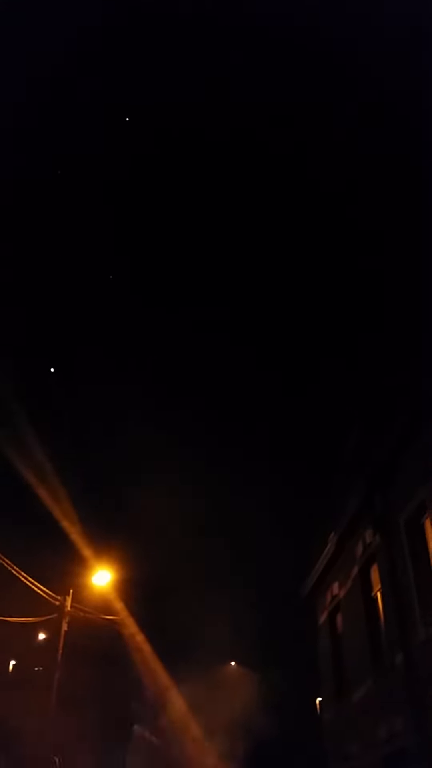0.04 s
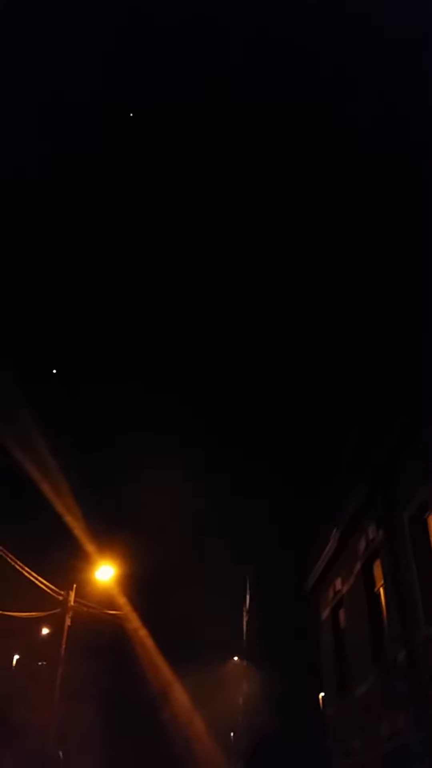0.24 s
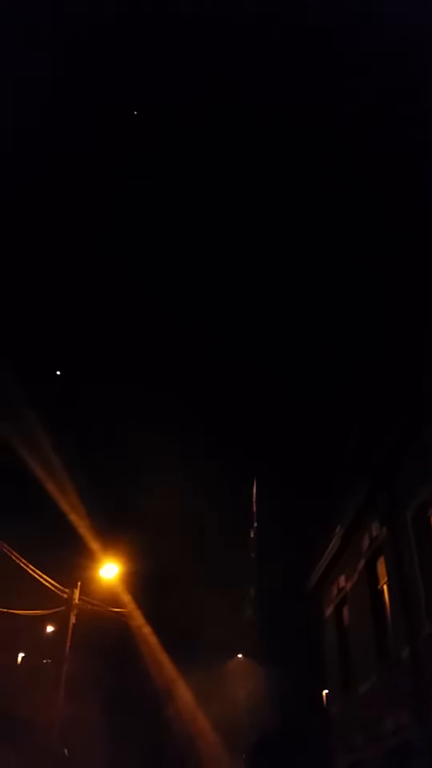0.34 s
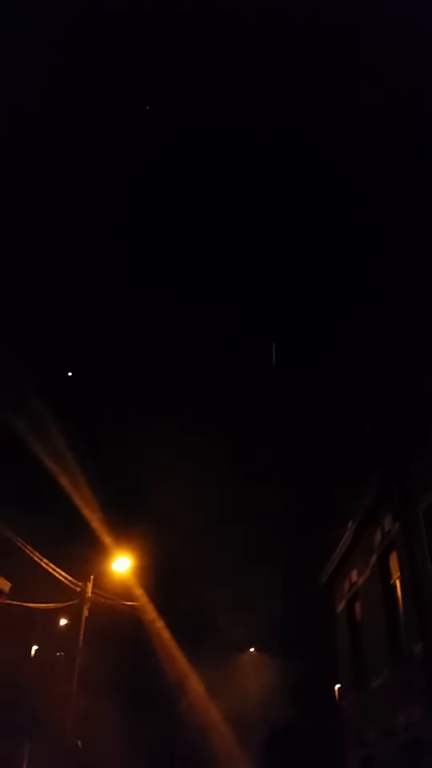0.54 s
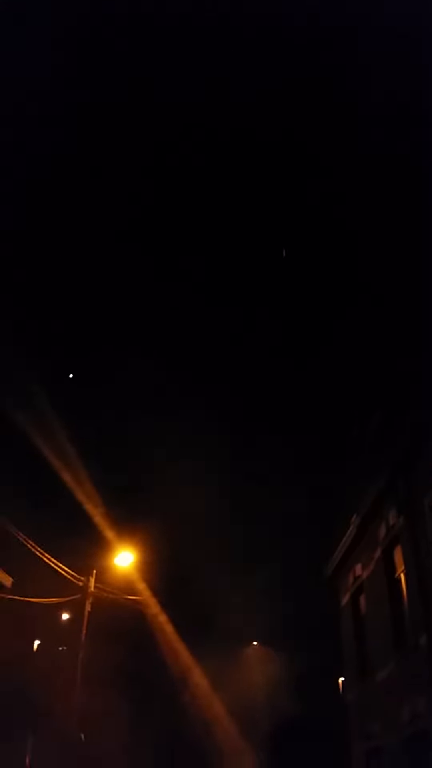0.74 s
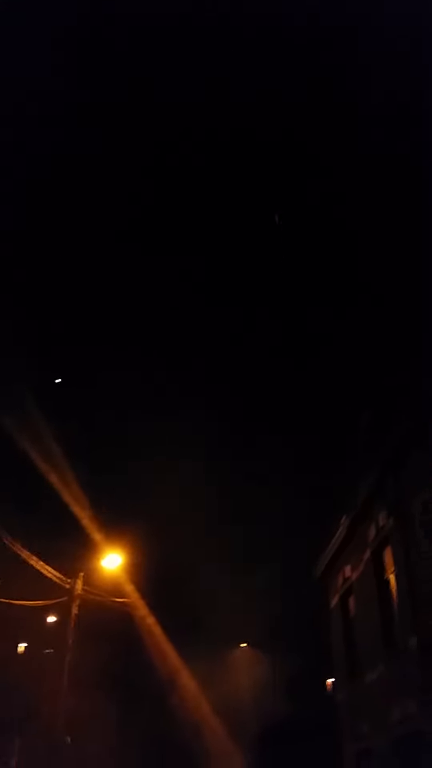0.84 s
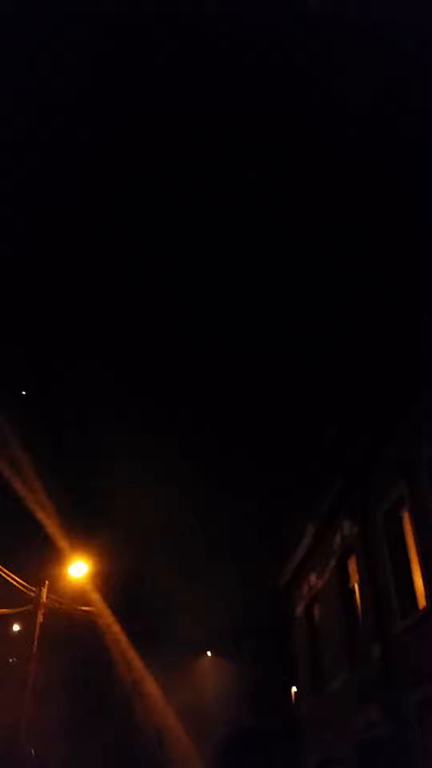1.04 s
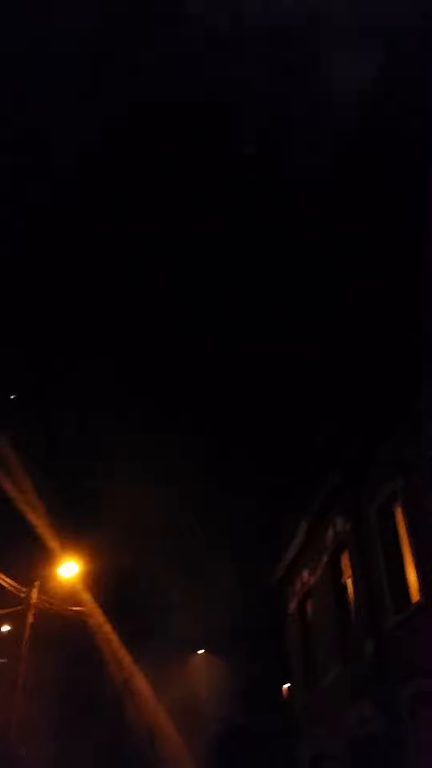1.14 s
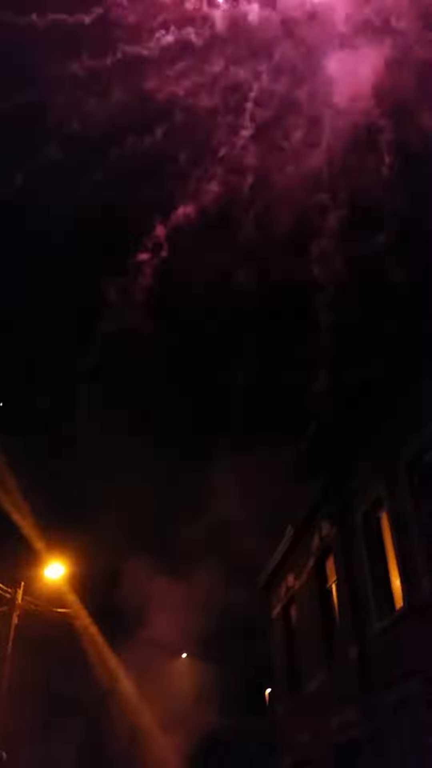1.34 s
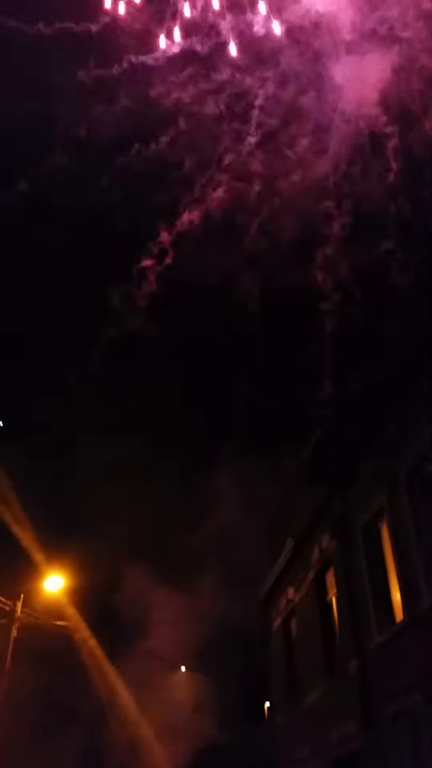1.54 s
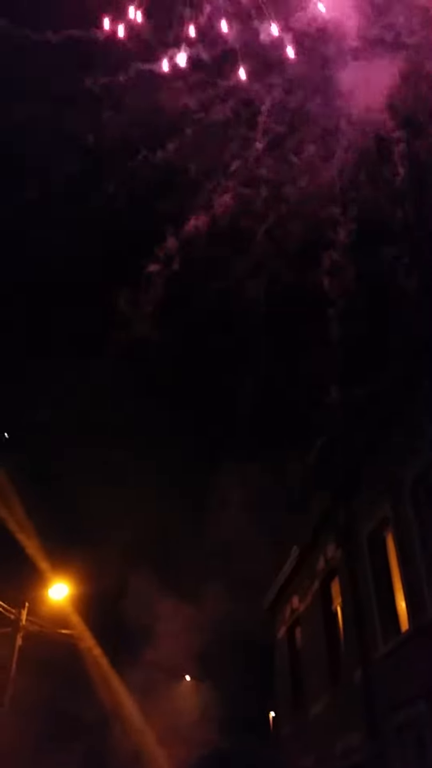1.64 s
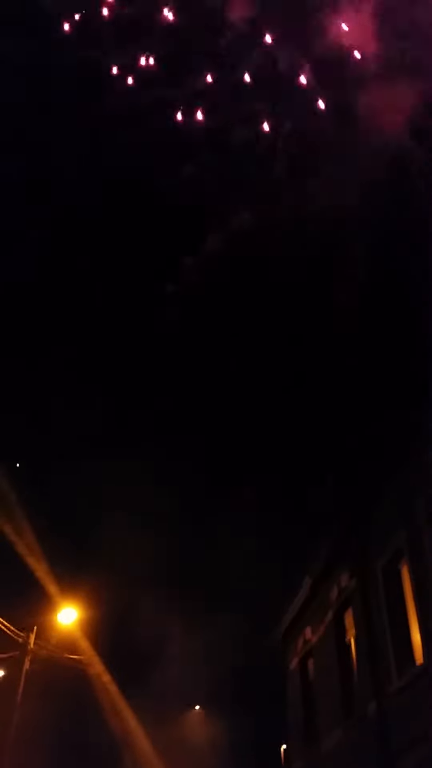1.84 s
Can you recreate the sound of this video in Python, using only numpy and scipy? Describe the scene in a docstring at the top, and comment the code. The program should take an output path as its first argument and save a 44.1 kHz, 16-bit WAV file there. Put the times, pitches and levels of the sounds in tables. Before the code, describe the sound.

Aerial fireworks explode with sharp overloaded bangs, house-front slaps and booming echoes rolling over town

```python
"""A street at night, two microphone ports: burning fireworks hiss and fade over the rumble of far shells. A
crackling shell bursts overhead, a heavy one right behind it with a harsh overload, later a third. Each is a
shock front plus filtered noise: slaps off the nearest house fronts and the ground, a roll between the houses
and a dying tail over the town, with faint distant pops. Decaying sines boom back, most from far blocks; short
noise swells make the crackle and pops, and the loudest peaks overload the microphones."""
import sys
import numpy as np
from scipy import signal
from scipy.fft import rfft, irfft, next_fast_len
from scipy.io import wavfile
from scipy.ndimage import map_coordinates

SR = 44100
rng = np.random.default_rng(int(sys.argv[2]) if len(sys.argv) > 2 else 0)


def wav_record(signal):
    """Record a signal, one row per channel, as 16-bit PCM in the file named by sys.argv[1]."""
    frames = np.transpose(np.atleast_2d(signal))
    bounded = np.clip(frames, -1, 1)
    # unit amplitude maps onto the largest positive 16-bit level
    quanta = np.round(bounded * 32767).astype(np.int16)
    wavfile.write(sys.argv[1], SR, quanta)


N = 83790
T = np.arange(N) / SR  # seconds


def amp(db):
    """Decibels to gain."""
    return 10 ** (np.asarray(db) / 20)


def along(points, hz):
    """Read (Hz, value) points on a log frequency axis."""
    point_hz, values = np.transpose(points)
    return np.interp(np.log(hz + 1), np.log(point_hz + 1), values)


def wobble(knots_per_s):
    """A smooth random curve through evenly spaced random knots."""
    knots = rng.standard_normal(N // 8)
    return map_coordinates(knots, [T * knots_per_s], mode="wrap")


def filtered(x, response):
    """Pass x through a complex response of frequency, padded so that its tail does not wrap round."""
    size = next_fast_len(N + SR // 2)
    hz = np.fft.rfftfreq(size, 1 / SR)
    return irfft(rfft(x, size) * response(hz), size)[..., :N]


# How the two microphone ports differ in level, before each sound's own shade factor.
# Each row: frequency in Hz, left minus right in dB.
PORT_SHADE = [(60, 3), (170, -2), (350, -1.9), (680, -4), (1350, -8.5), (2400, -16), (3800, -11),
              (5500, -18), (7500, -4), (10000, 13), (15000, -7)]


def ports(hz, shade, left_lead_s):
    """Responses of the two ports: level differs with pitch, and the left one leads (or lags, if negative)."""
    sides = np.array([[.5], [-.5]])  # left, right
    pair = amp(shade * along(PORT_SHADE, hz) * sides)
    pair = pair / np.sqrt(np.mean(pair ** 2, axis=0))
    return pair * np.exp(2j * np.pi * hz * left_lead_s * sides)


# How alike scattered sound is at the two ports, before shade and lag.
# Each row: frequency in Hz, left-right likeness from 0 to 1.
PORT_LIKENESS = [(60, .94), (170, 0.98), (330, 0.91), (650, .6), (1400, 0.43), (3000, 0.33), (7000, 0.26)]
GRAIN_PER_S = 1200  # knots per second: how fast scattered echoes swell and drop
LEFT_LAG_S = 0.00026  # scattered sound reaches the right port first
# close surfaces comb the treble: longest detour, strength of each detour, lower edge
NEAR_DELAY_S, NEAR_GAIN, NEAR_HZ = 0.01, 0.14, 1207


def scatter(colour, shade, grain_db=0):
    """Noise from all directions at both ports, combed by close surfaces; the mean of the ports has rms 1."""
    white = rng.standard_normal((2, N)) * amp(grain_db * wobble(GRAIN_PER_S))

    def mid_and_side(hz):
        likeness = np.clip(along(PORT_LIKENESS, hz), 0, 1)
        width = np.tan(np.arccos(likeness) / 2)
        return amp(along(colour, hz)) * np.array([np.ones_like(hz), width])

    mid, side = filtered(white, mid_and_side)
    detours_s = rng.random((5, 1)) * NEAR_DELAY_S

    def combed_ports(hz):
        detours = np.exp(-2j * np.pi * hz * detours_s).sum(axis=0)
        comb = 1 + NEAR_GAIN * hz / (hz + NEAR_HZ) * detours
        return ports(hz, shade, -LEFT_LAG_S) * comb

    pair = filtered(np.array([mid + side, mid - side]), combed_ports)
    return pair / np.std(pair.mean(axis=0))


# Level of the burning fireworks. Each row: time in seconds, level in dB.
HISS_LEVEL = [(0, -37), (.2, -38), (.5, -42.5), (.9, -61.5), (1.9, -58)]
# Spectrum of that hiss. Each row: frequency in Hz, relative level in dB.
HISS_SPECTRUM = [(18, -57.5), (30, -16), (71, -2), (114, -10.5), (152, 3.5), (208, -12.5), (237, -6),
                 (389, -11.5), (492, -20), (639, -16.5), (852, -19.5), (1020, -19.5), (1260, -27.5),
                 (2180, -19), (3150, -29.5), (3880, -21), (6050, -46.5), (8060, -74), (15500, -45)]
# Spectrum of the far shells. Each row: frequency in Hz, relative level in dB.
FAR_SPECTRUM = [(18, -26.5), (30, 3), (129, 1), (281, -8), (315, -9), (508, -14), (766, -11), (898, -15.5),
                (1520, -23), (2400, -27), (7000, -66), (9100, -86.5), (15400, -120)]
HISS_SHADE, FAR_SHADE = 0.69, 0.8  # factors on the port shade
FAR_DB = -48.5


def background():
    """The fading noise of burning fireworks over the steady, grainy rumble of far ones."""
    hiss_level = amp(np.interp(T, *np.transpose(HISS_LEVEL)))
    hiss = hiss_level * scatter(HISS_SPECTRUM, HISS_SHADE)
    rumble = amp(FAR_DB) * scatter(FAR_SPECTRUM, FAR_SHADE, grain_db=2.5)
    return hiss + rumble


# Spectral balance of a blast at the microphones. Each row: frequency in Hz, gain in dB.
BLAST_SPECTRUM = [(800, 0), (1700, 3.5), (3000, 2), (5300, -4.5), (7200, -15.5), (15000, -11)]
AIR_HZ = 4600  # air takes the top off a blast
MIC_LOW_HZ, MIC_Q = 133, 1.31  # the microphone's resonant bass cut
BLAST_SHADE = 0.99  # factor on the port shade


def blast(start_s, db, push_s, edge_hz, left_lead_s):
    """A shock front and its suction, dulled by the air and rung by the microphone's bass cut."""
    u = np.maximum(T - start_s, 0) / push_s
    pressure = amp(db) * (T >= start_s) * (1 - u) * np.exp(-u)

    def path_to_ports(hz):
        p = 1j * hz / MIC_LOW_HZ
        bass_cut = p * p / (p * p + p / MIC_Q + 1)
        p = 1j * hz / AIR_HZ
        air = 1 / (p * p + p + 1) ** 2 / (1 + p)
        treble_edge = 1 / (1 + 1j * hz / edge_hz)
        colour = amp(along(BLAST_SPECTRUM, hz)) * air * treble_edge
        return bass_cut * colour * ports(hz, BLAST_SHADE, left_lead_s)

    return filtered(pressure, path_to_ports)


# How the fall between the houses varies with pitch. Each row: frequency in Hz, factor on the fall.
FALL_FACTOR = [(50, 0.43), (130, 0.86), (300, 0.81), (700, .98), (2500, 0.83), (5500, 0.88), (8000, 1.47),
               (11000, 1.27), (15000, 2.9)]
# Spectrum of the town's answer, on top of the roll's own. Each row: frequency in Hz, gain in dB.
TOWN_SPECTRUM = [(60, 5), (150, 2), (300, -1), (600, -0.5), (1200, 1.5), (2300, 3.5), (4000, -11.5),
                 (8000, -37.5), (15000, -54)]
TOWN_DB, TOWN_FALL_DB_PER_S = -18.5, 25.5  # the long roll over the roofs, level relative to the roll
SAG_DB_PER_S = 12.5  # while the street holds the sound
BASS_HZ, BASS_DIP_DB = 220, 1  # bass edge, and the bass's loss per doubling of its hold
TREBLE_HZ, TREBLE_BUILD = 5000, 2.7  # treble edge, and its extra build-up time as a multiple of build_s


def roll(start_s, db, build_s, hold_s, bass_hold_s, fall_db_per_s, shade, grain_db, colour):
    """Dense echoes hold between the houses, then fall at a rate set by pitch, into a long roll over the town."""
    hz, t, spectrum = signal.stft(scatter(colour, shade, grain_db), SR, nperseg=512)
    hz = hz[:, None]
    age = np.maximum(t - start_s, 0)
    bass = 1 / (1 + (hz / BASS_HZ) ** 4)
    hold = hold_s + bass_hold_s * bass
    sag_db = SAG_DB_PER_S * np.minimum(age, hold)
    bass_dip_db = BASS_DIP_DB * np.log2(hold / hold_s)
    fall_db = fall_db_per_s * along(FALL_FACTOR, hz) * np.maximum(age - hold, 0)
    street = amp(-sag_db - bass_dip_db - fall_db)
    town = amp(TOWN_DB + along(TOWN_SPECTRUM, hz) - TOWN_FALL_DB_PER_S * age)
    treble = hz ** 4 / (hz ** 4 + TREBLE_HZ ** 4)
    gather = 1 - np.exp(-age / (TREBLE_BUILD * build_s)) * treble
    echoes = spectrum * gather * np.hypot(street, town)
    tail = signal.istft(echoes, SR, nperseg=512)[1][:, :N]
    build_up = 1 - np.exp(-np.maximum(T - start_s, 0) / build_s)
    return tail * amp(db) * build_up


# The three shells over the street. Each row: start in seconds, blast level in dB before its filters,
# push length in seconds, treble edge in Hz, left lead in seconds, street level in dB,
# build-up in seconds, hold in seconds, extra hold of the bass in seconds,
# fall in dB per second before the factor by pitch, factor on the port shade,
# graininess in dB per unit of the random curve.
SHELL_BURSTS = [(0.2104, -17, .0012, 1500, 0, -18.5, 0.0012, 0.16, 0, 109.5, 1.25, 3.2),
                (.3100, 12, 0.0022, 5000, -.0002, -13.5, 0.001, 0.069, 0.11, 74, 1.01, 2),
                (1.4030, 6, .0008, 2950, .0003, -16.5, 0.009, .13, .0, 69.5, 0.94, 1.5)]
# Spectra of the three rolls. Each row: frequency in Hz, relative level in dB.
CRACKLING_SPECTRUM = [(18, -55), (30, -24), (196, 0), (296, -6), (383, -15.5), (640, -16.5), (894, -34.5),
                      (965, -24), (1530, -18), (2040, -20), (2310, -16), (3580, -21.5), (5840, -31),
                      (8160, -53.5), (14000, -45.5)]
HEAVY_SPECTRUM = [(18, -46), (30, -16.5), (80, -2), (191, -0.5), (235, -8.5), (373, -14.5), (413, -18.5),
                  (458, -9), (548, -13), (608, -11), (674, -13), (766, -6), (894, -17), (2040, -21.5),
                  (2990, -31), (3870, -27.5), (5690, -34), (8370, -44.5), (14000, -43)]
LAST_SPECTRUM = [(18, -44.5), (30, -35), (70, -15), (109, -4.5), (191, -4.5), (274, -2.5), (458, -12.5),
                 (534, -12), (592, -16), (728, -15), (1130, -22.5), (1460, -17.5), (1840, -20.5),
                 (2770, -24.5), (2990, -33), (3680, -31.5), (5840, -41.5), (7550, -50), (14000, -46.5)]


def shells():
    """Every burst: the direct blast, then the street's answer."""
    out = 0
    spectra = (CRACKLING_SPECTRUM, HEAVY_SPECTRUM, LAST_SPECTRUM)
    for (start_s, db, push_s, edge_hz, left_lead_s, *street), spectrum in zip(SHELL_BURSTS, spectra):
        out = out + blast(start_s, db, push_s, edge_hz, left_lead_s)
        out = out + roll(start_s, *street, spectrum)
    return out


# Short bright cracks: crackle of the first shell, harsh overload at the heavy blast, faint distant pops.
# Each row: start in seconds, peak of the envelope in dB.
SHORT_CRACKS = [(0.219, -20), (0.2279, -18), (0.246, -22), (0.265, -17.5), (.2880, -21), (0.305, -21),
                (.3090, -6), (0.3105, -6), (.3160, -12.5), (.3420, -17), (1.4940, -25.5), (1.012, -64),
                (1.288, -68), (1.367, -61.5)]
# Spectrum of the cracks. Each row: frequency in Hz, relative level in dB.
CRACK_SPECTRUM = [(300, -16.5), (1400, 0), (4000, 0), (5800, -8), (7800, -31), (12000, -28), (15000, -37)]
CRACK_S, CRACK_SHADE = 0.00094, 1.2  # rise to the peak in seconds, factor on the port shade


def cracks():
    """Crackle, harsh overload at the heavy blast and faint pops, each a brief swell of scattered noise."""
    level = 0
    for start_s, db in SHORT_CRACKS:
        u = np.maximum(T - start_s, 0) / CRACK_S
        level = level + amp(db) * u * np.exp(1 - u)
    return level * scatter(CRACK_SPECTRUM, CRACK_SHADE)


# Slaps off near walls and the ground. Each row: start in seconds, level in dB before the blast's filters, #
# push length in seconds, treble edge in Hz, left lead in seconds.
NEAR_SLAPS = [(.2325, -26, 0.0019, 1200, -.0002), (.2425, -12, 0.0022, 1190, 0),
              (.3160, 3, .0015, 4000, -.0003), (0.3196, 4, .0006, 3000, -.0002),
              (.3260, -4, .0007, 2500, -.0003), (.3430, 1, .0004, 4000, -.0003),
              (1.4077, 4, 0.00087, 456, 0), (1.4129, 6, 0.00097, 730, -.0003),
              (1.5010, -3.5, 0.0018, 1100, 0), (1.5346, -3, 0.000336, 2000, -.0002),
              (1.537, -8, .0003, 2000, -.0002)]
# Dull low booms of the shells, most of them back from far blocks of houses.
# Each row: start in seconds, peak of the envelope in dB, pitch in Hz.
LOW_BOOMS = [(.436, -10, 167.8), (0.485, -12.5, 93.4), (0.528, -13.5, 113), (0.584, -21.5, 81.7),
             (0.931, -32, 125), (0.987, -36, 75), (1.12, -41, 90), (1.404, -23, 55.5), (1.453, -28, 106),
             (1.495, -19, 99), (1.617, -22.5, 117)]
BOOM_RISE_S = .009


def reflections():
    """Near walls and the ground return the blast as a slap; the booms are short swelling sines, alike at both
    ports."""
    out = sum(blast(*slap) for slap in NEAR_SLAPS)
    for start_s, db, pitch_hz in LOW_BOOMS:
        age = np.maximum(T - start_s, 0)
        swell = age / BOOM_RISE_S * np.exp(1 - age / BOOM_RISE_S)
        out = out + amp(db) * swell * np.sin(2 * np.pi * pitch_hz * age)
    return out


def scene():
    """The street under the fireworks."""
    return background() + shells() + cracks() + reflections()


CLIP_TOP, CLIP_HARDNESS = 0.95, 5.2  # full-scale ceiling, sharpness of the bend towards it
TOP_HZ = 16000  # band limit


def record(dry):
    """The microphones overload smoothly on the peaks; a steep filter then cuts above the band limit."""
    overload = np.abs(dry / CLIP_TOP) ** CLIP_HARDNESS
    clipped = dry / (1 + overload) ** (1 / CLIP_HARDNESS)
    return filtered(clipped, lambda hz: 1 / (1 + (hz / TOP_HZ) ** 120))


dry = scene()
out = record(dry)
wav_record(out)
```